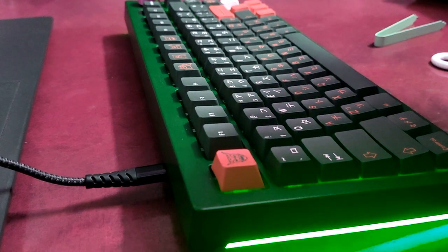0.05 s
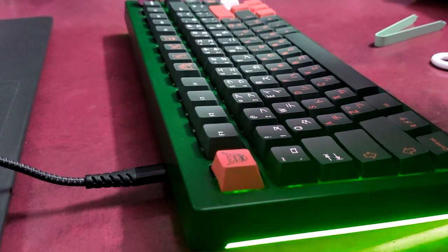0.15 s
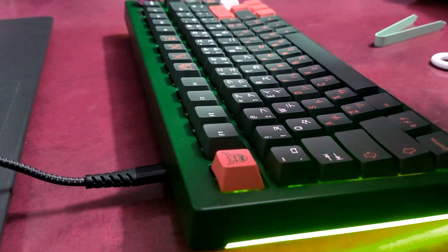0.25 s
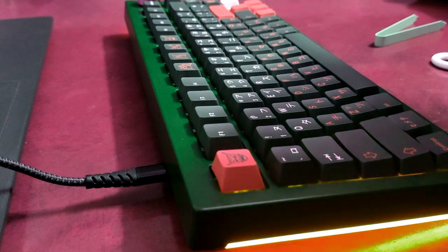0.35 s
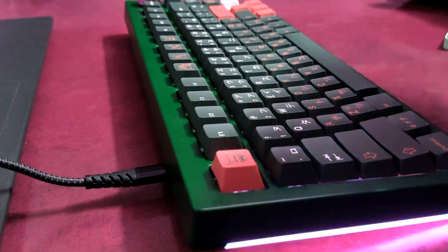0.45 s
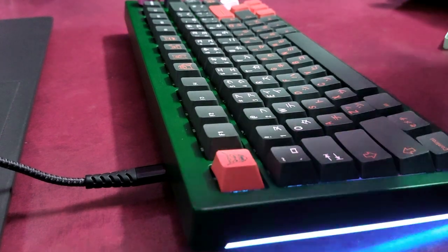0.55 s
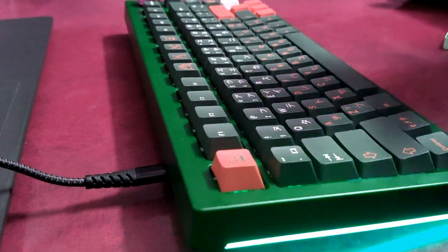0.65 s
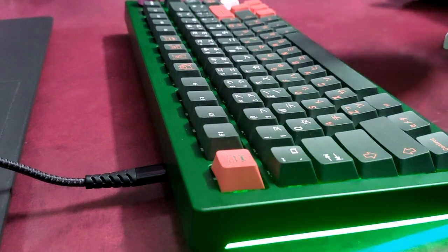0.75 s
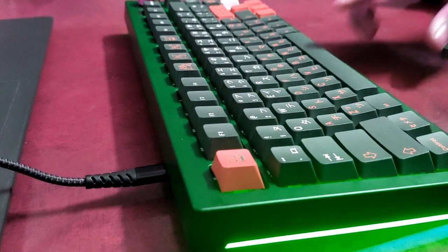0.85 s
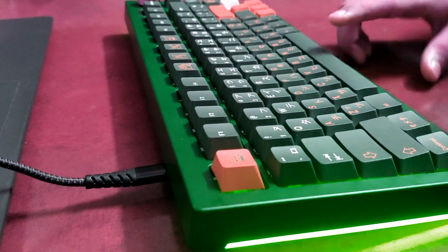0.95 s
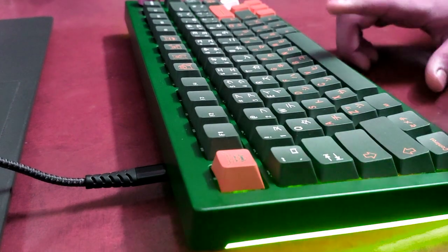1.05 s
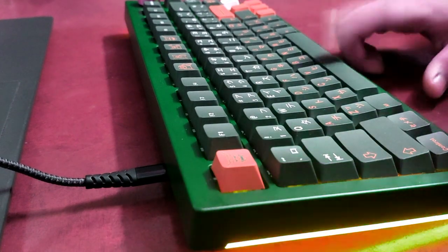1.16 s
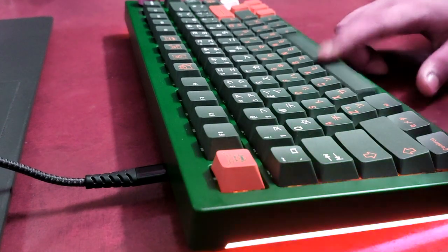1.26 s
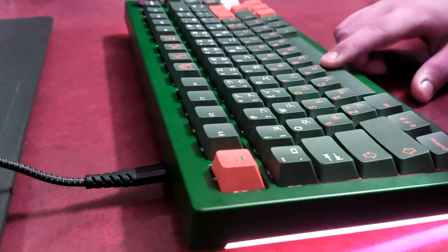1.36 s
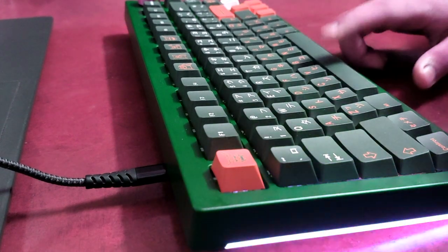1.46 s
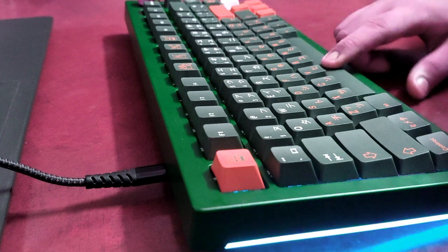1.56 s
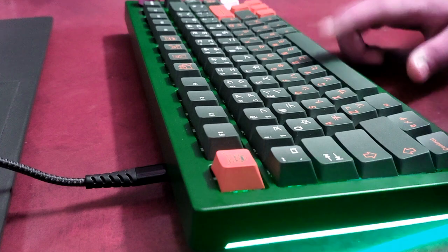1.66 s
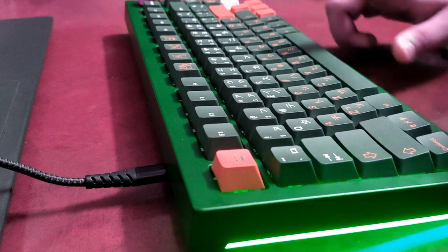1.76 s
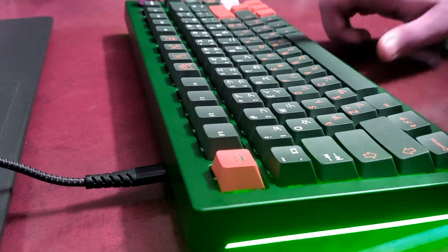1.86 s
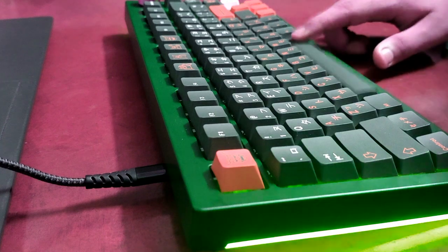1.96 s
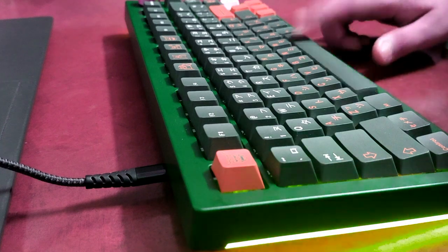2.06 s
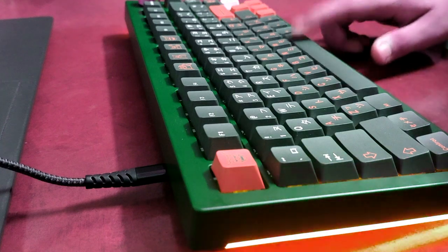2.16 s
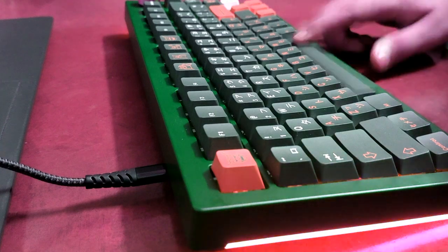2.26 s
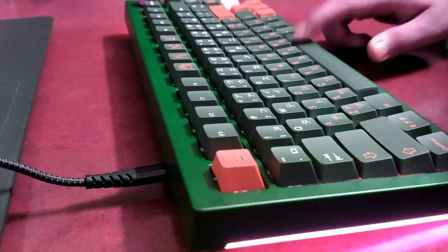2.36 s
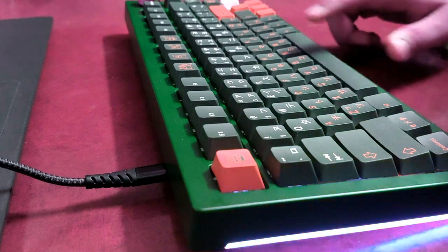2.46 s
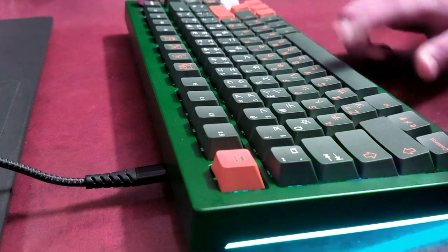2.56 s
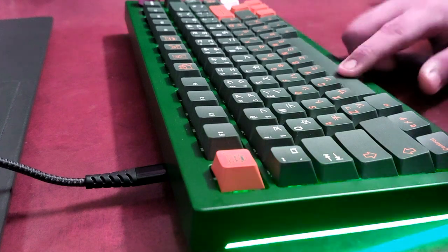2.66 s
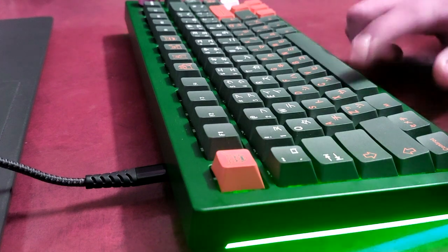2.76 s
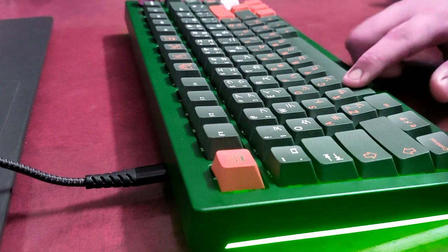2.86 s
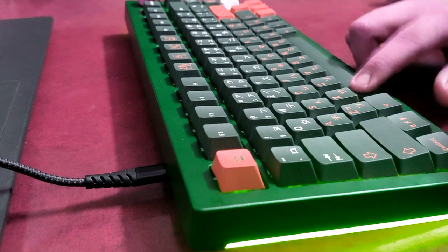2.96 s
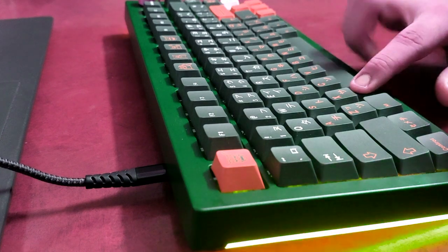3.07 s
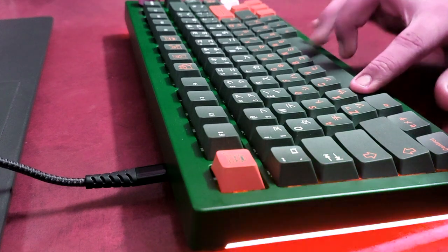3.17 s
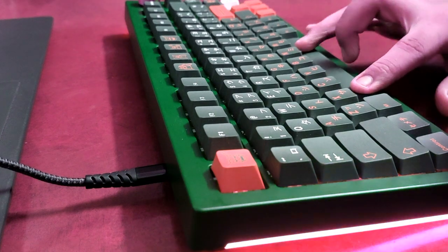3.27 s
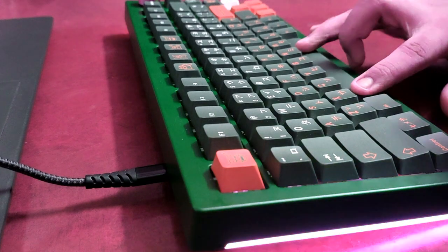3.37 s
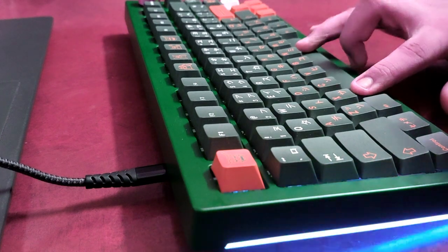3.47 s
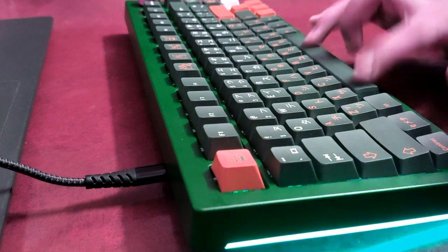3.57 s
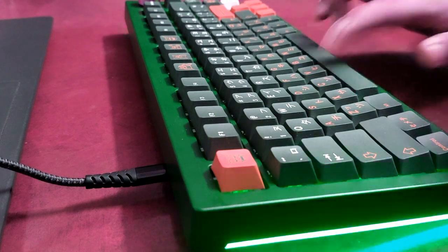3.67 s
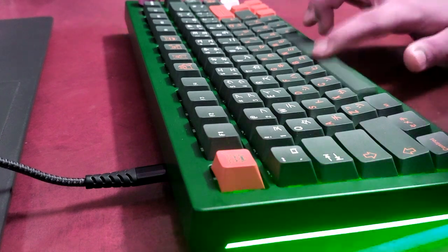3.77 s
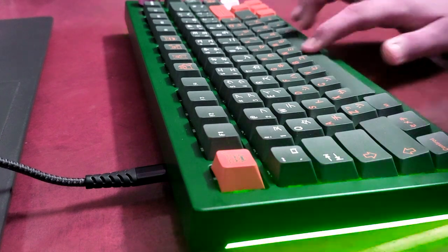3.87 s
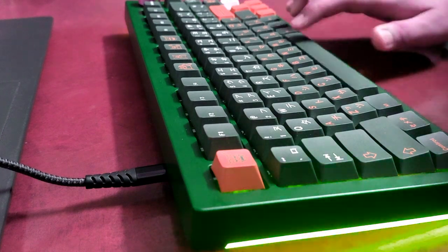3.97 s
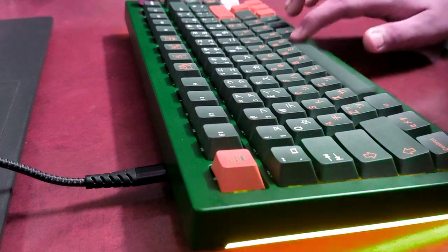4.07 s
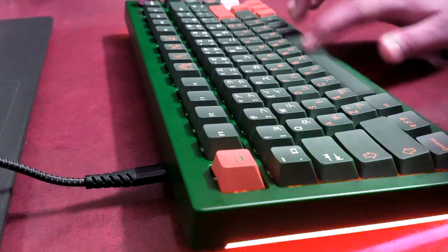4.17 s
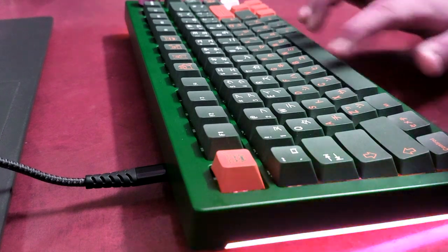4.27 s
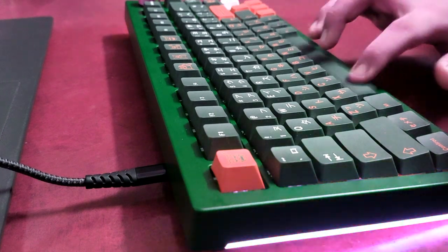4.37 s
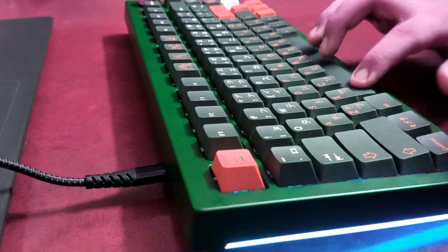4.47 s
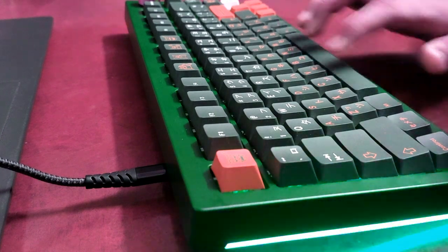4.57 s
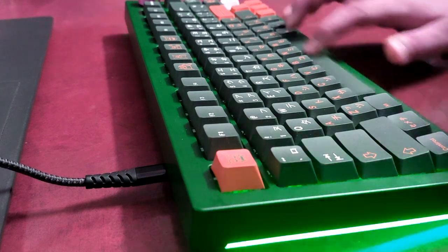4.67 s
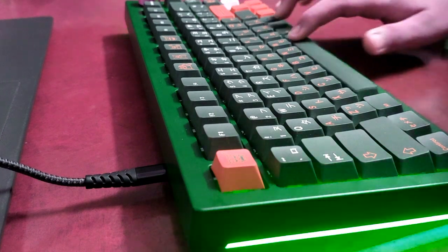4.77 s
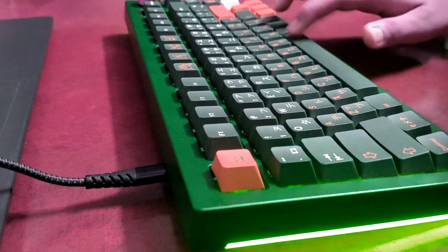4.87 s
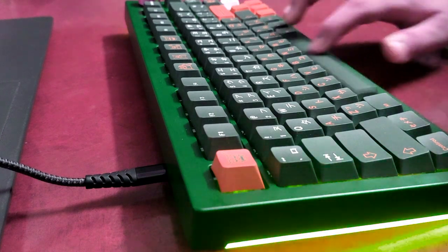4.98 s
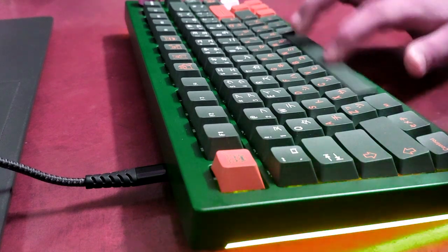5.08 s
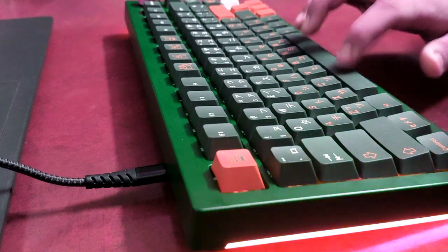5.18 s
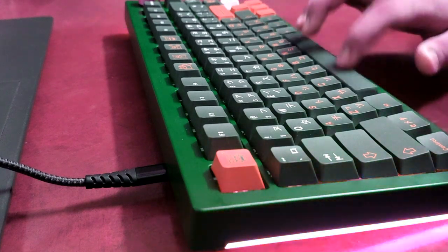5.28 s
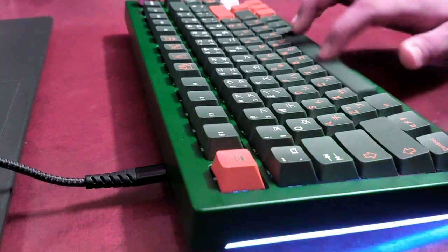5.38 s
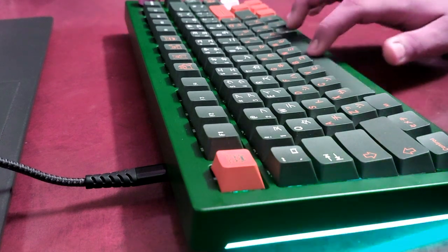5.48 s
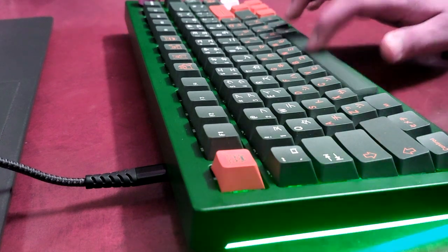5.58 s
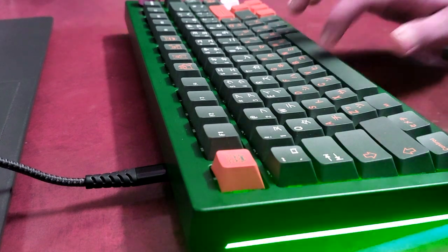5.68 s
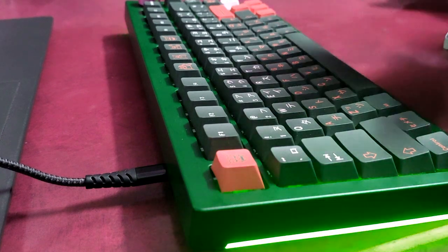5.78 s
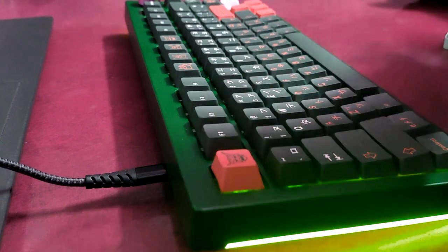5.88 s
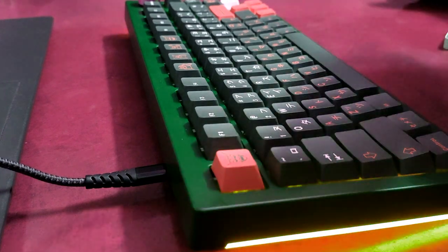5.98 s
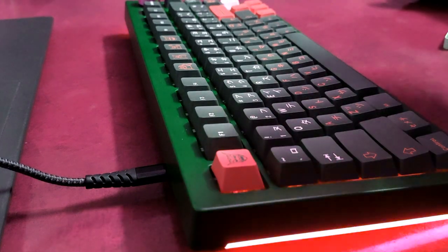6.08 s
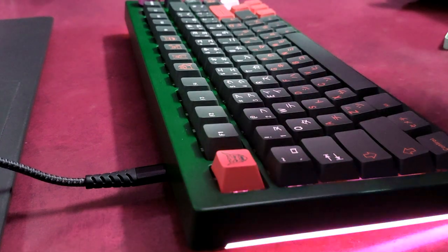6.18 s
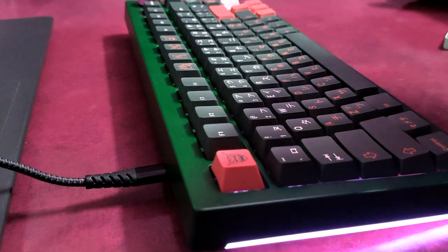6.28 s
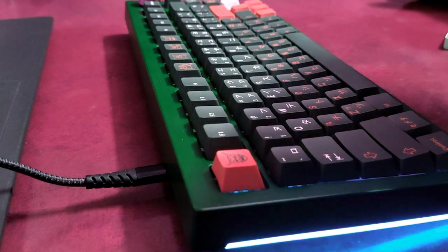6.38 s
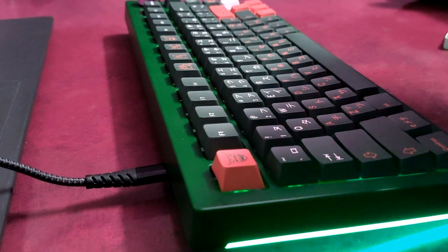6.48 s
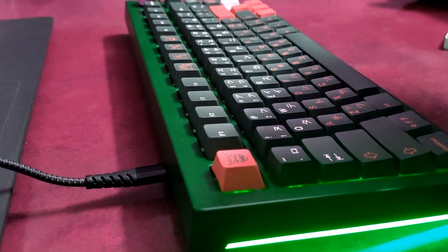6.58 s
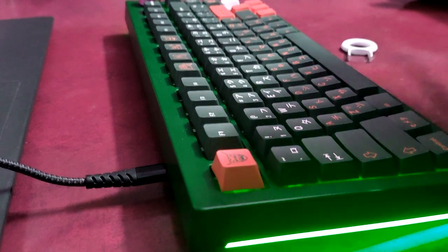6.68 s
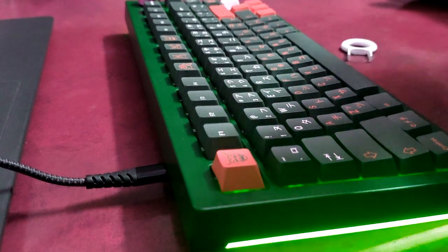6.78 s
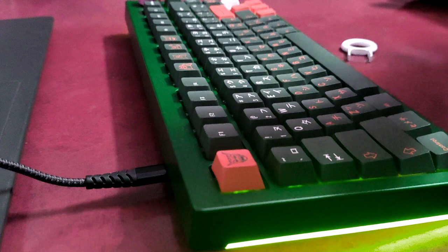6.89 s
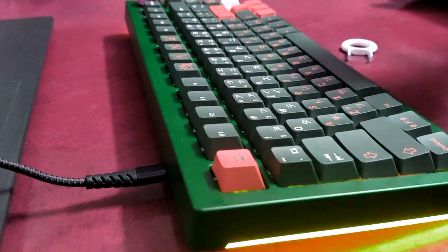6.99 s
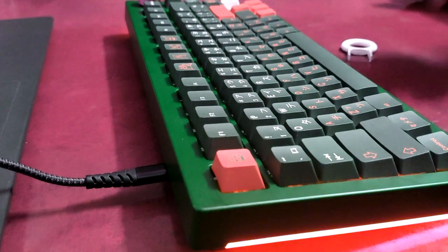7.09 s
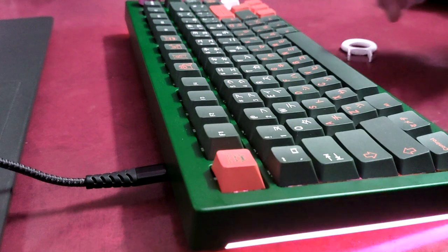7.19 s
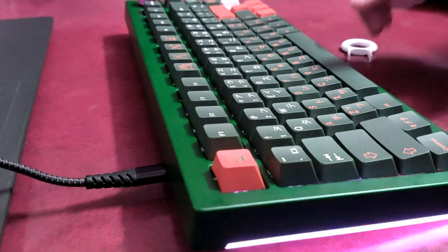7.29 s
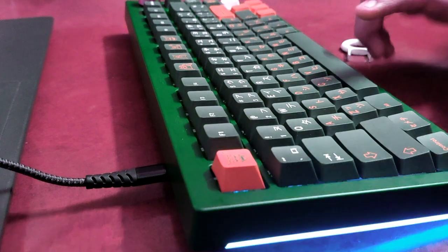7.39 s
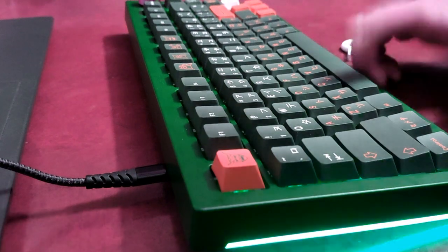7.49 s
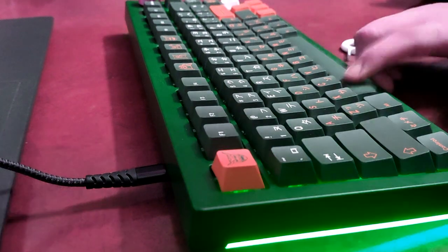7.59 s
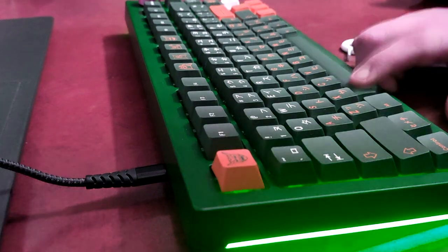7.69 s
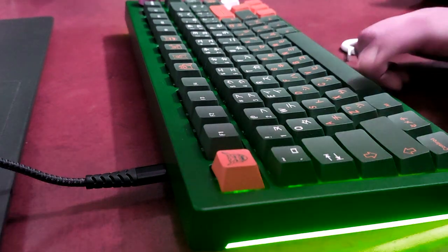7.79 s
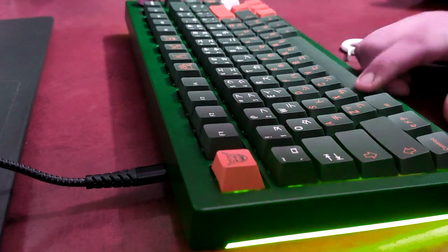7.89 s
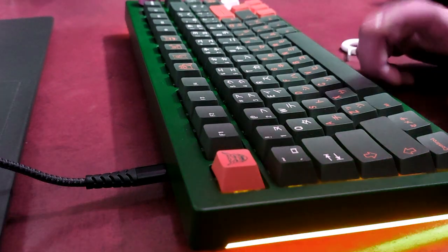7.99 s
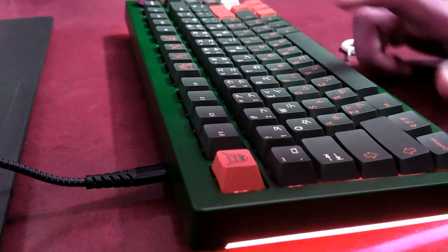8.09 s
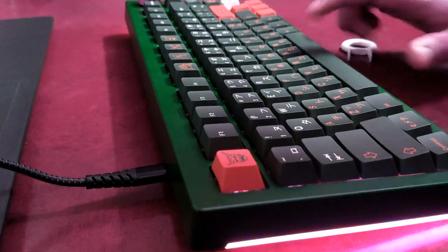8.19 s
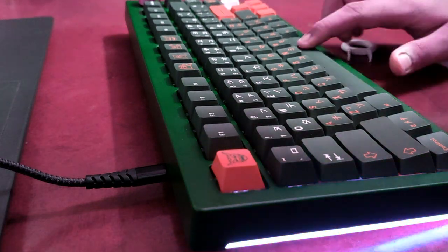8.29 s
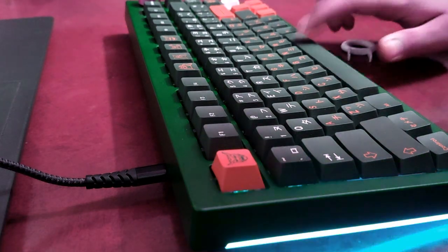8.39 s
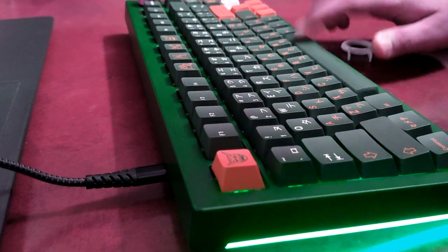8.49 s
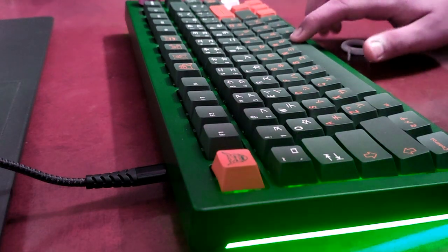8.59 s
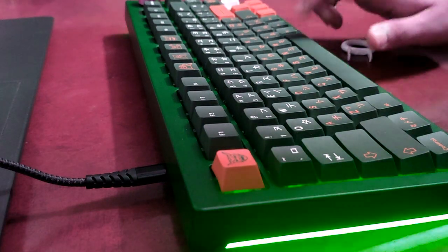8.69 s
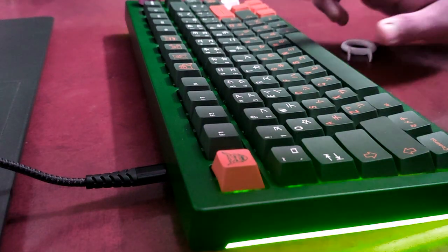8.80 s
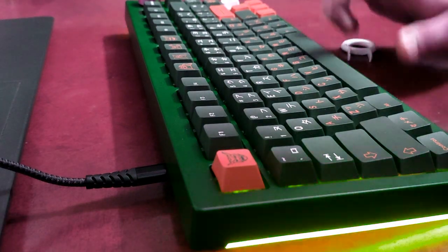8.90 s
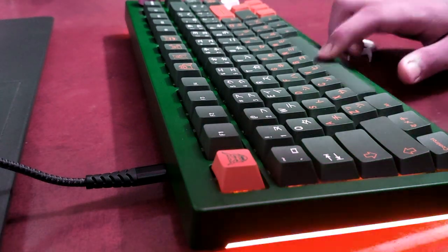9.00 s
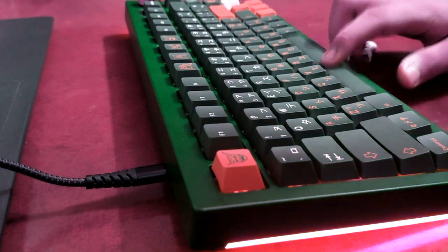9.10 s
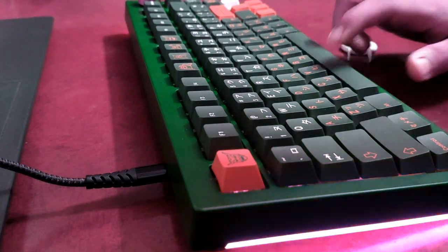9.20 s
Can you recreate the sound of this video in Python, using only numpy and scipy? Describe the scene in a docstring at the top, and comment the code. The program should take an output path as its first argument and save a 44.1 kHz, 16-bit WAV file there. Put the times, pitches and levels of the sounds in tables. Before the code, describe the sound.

A finger strikes a keyboard's long bar in brief, regular bursts. At first each press is a bright, hollow plastic clack with a rattly edge and metallic ring, followed by a lighter return tick. The taps grow busier, then stop, leaving faint hand rustle and quiet hum. Later presses are damped, shorter thocks with barely audible returns. Close microphone, short indoor reflections.

```python
"""Short bursts of taps on the space bar of a mechanical keyboard, close by in stereo: at first hollow and loud,
later damped and softer. Each blow is a chatter of contacts that excites the bar's modes; most presses are
answered by a lighter return stroke. Clusters of close modes give the spring's faint singing, decaying sines the
wire's pings. Echoes and decaying noise form a small room; filtered noise and wavering sines make the hum of a
fan, and swelling noise the swish of a moving hand."""
import sys
import numpy as np
from scipy import signal
from scipy.fft import rfft, irfft
from scipy.io import wavfile
from scipy.ndimage import uniform_filter1d

SR = 44100
rng = np.random.default_rng(int(sys.argv[2]) if len(sys.argv) > 2 else 0)


def generate_wav(signal):
    """Clip the signal to [-1, 1] and save it as 16-bit WAV at the path in sys.argv[1]."""
    frames = np.transpose(np.atleast_2d(signal))
    scaled = np.clip(frames, -1, 1) * 32767
    pcm = np.round(scaled).astype(np.int16)
    wavfile.write(sys.argv[1], SR, pcm)


N = 407484
TAPS = 8192  # samples in the response to one blow
HZ = np.fft.rfftfreq(TAPS, 1 / SR)
AGE = np.arange(TAPS) / SR  # seconds since the blow
LEAD = 128  # samples of space ahead of a blow
DOWN, UP = 0, 1  # direction of the bar's travel


def amp(db):
    """Level law: decibels to amplitude gain."""
    return 10 ** (np.asarray(db) / 20)


def evened(x):
    """Normalization: scales to rms 1."""
    return x / np.sqrt(np.mean(np.abs(x) ** 2) + 1e-20)


def read(points, hz):
    """Interpolates a table linearly on a log-frequency axis."""
    f, value = np.transpose(points)
    return np.interp(np.log(hz + 1), np.log(f + 1), value)


def follow(curve):
    """Interpolates a table of times at every sample."""
    return np.interp(np.arange(N) / SR, *np.transpose(curve))


def sides(db):
    """Stereo level difference: gains for left and right."""
    return amp(np.array([db, -db]) / 2)


def add(mix, s, sound):
    """Superposition: lays a sound of several channels into the mix."""
    part = mix[:, max(round(s * SR), 0):][:, :sound.shape[1]]
    part += sound[:, :part.shape[1]]


def causal(gain):
    """Minimum phase: the spectrum with these gains that rings only after it is struck."""
    log_gain = np.log(np.maximum(gain, 1e-5))
    circle = np.concatenate([log_gain, log_gain[..., -2:0:-1]], -1)
    return np.exp(np.conj(signal.hilbert(circle)))[..., :len(HZ)]


def pulse(spectrum):
    """Inverse transform: a spectrum as a short sound that starts LEAD samples in."""
    delayed = spectrum * np.exp(-2j * np.pi * HZ * LEAD / SR)
    return irfft(delayed)[:TAPS // 2]


def presses(rows, modes, low_hz, level_db, spring_db, lead_in_db, settle_s):
    """Impact: a faint swelling noise leads into each blow as the bar bottoms out; off centre, it lands twice."""
    # Relative level in dB of thock, clack, snap, click and fizz for a blow in the middle: it clacks.
    centre_db = [-3.5, 4.5, 0, 1.5, -4.5]
    # The same five bands in dB for a blow on one end: it thocks.
    end_db = [5, -10, -2, 0, -1.5]
    swell_s = 0.011
    out = np.zeros((3, N))
    for s, db, off_centre, hardness_db in rows:
        off = np.clip(off_centre, 0, 1)
        bands_db = (1 - off) * np.array(centre_db) + off * np.array(end_db)
        colour = body(modes, DOWN, low_hz) * amp(db + level_db + tone_db(bands_db, hardness_db))
        rock_s = off * 0.0021 - .0002  # the further off centre, the later the second landing
        blow = chatter(rock_s, first=0.99, settle_s=settle_s, smooth=0.71)
        add(out, s - LEAD / SR, pulse(colour * blow))
        add(out, s, amp(db + spring_db) * spring(DOWN))
        swelling = rng.standard_normal(TAPS) * (AGE < swell_s) * (0.2 + AGE / swell_s)
        lead_in = evened(rfft(swelling))
        add(out, s - swell_s - LEAD / SR, amp(lead_in_db) * pulse(colour * lead_in))
    return out


def releases(rows, modes, low_hz, level_db, spring_db, settle_s):
    """Return impact: the spring throws the bar against its top stop and is left ringing."""
    # Relative level in dB of thock, clack, snap, click and fizz.
    release_db = [0.43, 0, -0.12, 0.82, -1.3]
    out = np.zeros((3, N))
    for s, db, hardness_db in rows:
        tone = tone_db(np.array(release_db), hardness_db)
        colour = body(modes, UP, low_hz) * amp(db + level_db + tone)
        blow = chatter(.0006, first=1.0, settle_s=settle_s, smooth=.9)
        add(out, s - LEAD / SR, pulse(colour * blow))
        add(out, s, amp(db + spring_db) * spring(UP))
    return out


def tone_db(bands_db, hardness_db):
    """Contact stiffness: a harder blow lifts snap, click and fizz but not thock and clack; dB over HZ."""
    # Centre frequencies in Hz of thock, clack, snap, click and fizz.
    tone_hz = [800, 1350, 2350, 4600, 9500]
    # Factors by which snap, click and fizz follow the hardness.
    hardness_share = [1, 1, 1.2]
    tone = bands_db + hardness_db * np.append(np.zeros(2), hardness_share)
    return read(list(zip(tone_hz, tone)), HZ)


def body(modes, direction, low_hz):
    """Modal resonance: the bar's damped modes toward left port, right port and room."""
    # Each row: frequency in Hz, phase in radians by which the left port leads the right.
    port_phase = [(500, 1), (760, 0.94), (900, 0.75), (1050, 1.8), (1400, 0.48), (1850, -2.5), (2200, -0.1),
                  (4500, 0.5), (6000, 1), (7800, 2), (9500, 1.1), (14000, 0.73)]
    hz, width, down, up, side = np.transpose(modes)[:, :, None]
    # the finger lands on a different spot each time, which loads and favours different modes
    load, favour = rng.standard_normal((2, len(modes), 1)) / (1 + direction)
    shape = 1 / (1 + (2 * (HZ - hz * (1 + 0.021 * load)) / width) ** 2)
    mode_gain = amp((down, up)[direction] + 0.62 * favour) * sides(side) * shape
    gain = np.linalg.norm(mode_gain, axis=1)
    gain = gain / np.sqrt(1 + (low_hz / (HZ + 1)) ** 10)  # a small cap radiates little bass
    common = np.sqrt((gain ** 2).mean(0))
    ports = gain * np.exp(1j * np.outer([.5, -.5], read(port_phase, HZ)))
    # treble peaks colour only the direct sound; the room receives a smoother treble
    smoothed = np.sqrt(np.abs(uniform_filter1d(common ** 2, size=330)))
    share = np.clip((HZ - 1800) / 3500, 0, 1)
    around = (1 - share) * common + share * smoothed
    return causal(common) / common * np.vstack([ports, around])


def chatter(delay, first, settle_s, smooth):
    """Repeated impact: one end of the bar lands, then the rest, each in a brief chatter of contacts."""
    late = AGE - max(delay, 0)
    first_force = first * np.exp(-(AGE / settle_s) ** 2)
    force = first_force + (late >= 0) * np.exp(-(late / settle_s) ** 2)
    z = rfft(force * rng.standard_normal(TAPS))
    # each contact is so short that it excites all modes about alike
    contacts = irfft(z / (np.abs(z) + 1e-9) ** min(smooth, 1))
    return evened(rfft(contacts * np.sqrt(force)))


def spring(direction):
    """Beating: clusters of close, long modes interfere, differently at each blow."""
    # Ringing of spring, stabiliser wire and case. Each row: frequency in Hz, width in Hz, relative level in dB
    # on a press, the same on a release, 60 dB decay time in seconds ahead of the final fade.
    clusters = [(756.6, 60, -44.5, -35, 0.19), (915, 170, -48, -36, 0.76), (1840, 220, -41, -40.5, 0.22),
                (3465, 430, -40, -42, 0.16)]
    ring = np.zeros((3, TAPS))
    for hz, width, down, up, t60 in clusters:
        band = 1 / (1 + (2 * (HZ - hz) / width) ** 4)
        cluster = irfft(rfft(rng.standard_normal((3, TAPS))) * band)
        level_db = (down, up)[direction] + 1.3 * rng.standard_normal()
        ring += evened(cluster) * amp(level_db - 60 * AGE / t60)
    return ring * (1 - AGE / AGE[-1])


def pings(rows, level_db):
    """Free decay: each hollow blow sets off a short, clear ping of the stabiliser wire, heard once more about
    20 ms later."""
    ping_hz, t60 = 3474, 0.018  # mean pitch; decay in seconds
    out = np.zeros((3, N))
    for s, db in rows[:, :2]:
        for late_s, again_db in [(0, 0), (0.021, 1.5)]:  # the repeat is slightly louder
            hz = ping_hz * (1 + 0.021 * rng.standard_normal())
            note = np.sin(2 * np.pi * (hz * AGE + rng.random((3, 1))))
            decay = amp(db + level_db + again_db - 60 * AGE / t60)
            add(out, s + late_s, note * np.minimum(AGE / .001, 1) * decay)
    return out


def touches(level_db, tilt_db):
    """Light impact: a fingertip rattles the loose cap, heard left, right and in the room."""
    # Soft knocks: mostly the fingertip landing and shifting the cap just before a press; the faint one at 6.623
    # s # is a click where the scene changes. Each row: start in seconds, relative strength in dB.
    landings = [(2.007, 1.5), (2.19, 4.5), (2.376, 5), (3.46, -2), (3.961, -3), (4.112, 1), (4.27, -2),
                (6.623, -20), (7.611, -6), (7.774, -9), (7.936, -11), (8.325, 4), (8.489, 0), (8.651, 2)]
    # Each row: frequency in Hz, level in dB ahead of the tilt.
    touch_colour = [(300, -16.5), (700, -13), (1400, -5), (2500, -9.5), (3800, -7), (5200, -17),
                    (8000, -26), (15000, -31.5)]
    out = np.zeros((3, N))
    octaves = np.log2(np.maximum(HZ, 500) / 1400)
    colour = causal(amp(read(touch_colour, HZ) + tilt_db * octaves))
    colour = colour * np.append(sides(-2.5), 1)[:, None]
    for s, db in landings:
        rattle = chatter(0.00079, first=0.84, settle_s=0.015, smooth=0.98)
        add(out, s - LEAD / SR, amp(db + level_db) * pulse(colour * rattle))
    return out


def room(x, echo_db, tail_db, build_s):
    """Slowly blended reverberation: two random responses of one small room alternate, for a smooth tail."""
    turn = 2 * np.pi * 1.3 * np.arange(N) / SR  # 1.3 turns a second
    wet = np.zeros((2, N))
    for blend in (np.cos(turn), np.sin(turn)):
        reflections = response(echo_db, tail_db, build_s)
        wet += signal.oaconvolve((x * blend)[None], reflections, axes=1)[:, :N]
    return wet


def response(echo_db, tail_db, build_s):
    """Room impulse response: a few single echoes, then a diffuse tail in which each band dies at its own speed."""
    # Desk, walls and ceiling. Each row: mean delay in seconds, relative level in dB.
    echoes = [(.0048, -12.5), (.0078, -29.5), (.0125, -24.5), (.0168, -27.5), (.0195, -32.5), (.0212, -21),
              (.041, -31.5)]
    # Each row: frequency in Hz, 60 dB decay time in seconds.
    room_t60 = [(500, .3), (1000, 0.28), (2000, 0.28), (4000, 0.38), (8000, 0.38), (15000, .21)]
    # Share of a blow that goes into the tail. Each row: frequency in Hz, relative level in dB.
    room_send = [(500, -9), (780, -8.5), (950, -4), (1350, -10.5), (1900, 0), (2500, -4.5), (3500, -0.5),
                 (5000, -8), (7500, -9.5), (9000, -10), (9900, -11.5), (11200, -5.5), (15000, -3)]
    size = SR // 2
    t = np.arange(size) / SR
    hz, age, z = signal.stft(rng.standard_normal((2, size)), SR, nperseg=256)
    t60 = read(room_t60, hz)[:, None]
    even_energy = np.sqrt(2 * np.log(1000) / (t60 * SR))  # long and short decays carry alike
    z *= amp(read(room_send, hz)[:, None] - 60 * age / t60) * even_energy
    diffuse = signal.istft(z, SR, nperseg=256)[1][:, :size]
    tail = amp(tail_db) * diffuse * np.clip(t / build_s, 0, 1)
    for s, db in echoes:
        for port in tail:
            port[round(abs(s + rng.uniform(-.0004, .0004)) * SR)] += amp(db + echo_db)
    return tail


def swish(level_db):
    """Friction noise: soft broad rubbing swells and fades with each move of the hand."""
    # Each row: frequency in Hz, level in dB ahead of the tilt.
    swish_colour = [(800, -20), (2400, -3), (3400, -1), (5000, -5.5), (6300, 0.5), (8800, -3), (9900, -9.5),
                    (11200, 0.5), (15000, -4.5)]
    # Hand and sleeve brush over the desk. Each row: time of the peak in seconds, relative level in dB,
    # half length in seconds, treble tilt in dB per octave above 2500 Hz.
    strokes = [(0.112, -75, 0.1, -2), (0.753, -59.5, 0.057, 2), (0.826, -62, .058, 0),
               (1.04, -71, 0.077, 0.5), (3.479, -66.5, 0.062, -9), (4.348, -43, 0.019, 3),
               (4.471, -44, 0.12, 5), (4.777, -58.5, .13, 2), (5.053, -55.5, 0.053, 0),
               (5.245, -61, .07, 6), (5.601, -57.5, 0.1, 7), (6.036, -61.5, 0.056, 3.5),
               (6.123, -62.5, 0.11, 8), (6.429, -52, .052, 11), (6.461, -68, 0.17, -4),
               (7.023, -72, .075, .5), (7.195, -60.5, 0.056, 4.5), (7.399, -66.5, 0.31, .5),
               (8.339, -62.5, .08, 4), (8.552, -72, 0.16, -7)]
    out, hz = np.zeros((2, N)), np.fft.rfftfreq(SR, 1 / SR)
    t = np.arange(SR) / SR - .5
    for s, db, half_s, tilt in strokes:
        octaves = np.log2(np.maximum(hz, 2500) / 2500)
        colour = amp(read(swish_colour, hz) + tilt * octaves)
        rub = evened(irfft(rfft(rng.standard_normal((2, SR))) * colour))
        # random unevenness of level
        rub *= amp(2.0 * evened(uniform_filter1d(rng.standard_normal(SR), size=700)))
        stroke = amp(db + level_db) * rub * np.exp(-(t / half_s) ** 2)
        start = max(round((.5 - s) * SR), 0)  # trims what would begin before time zero
        add(out, s - .5, stroke[:, start:])
    return out


def fan(rush_db, tones_db, waver):
    """Tonal and broadband flow noise: slightly wavering motor tones in a low rush of air."""
    # Each row: frequency in Hz, relative level in dB.
    fan_tones = [(48, -69.5), (80.7, -62.5), (99.3, -62), (117, -67.5), (165, -65.5), (199.8, -60.5),
                 (241, -60.5), (300.3, -55.5), (333, -63), (399, -78), (438, -72.5), (487, -63.5),
                 (1378, -79.5)]
    # Rush of air. Each row: frequency in Hz, relative density in dB per Hz.
    fan_rush = [(20, -27.5), (50, -21.5), (85, -3.5), (120, -6), (145, -15.5), (205, -9.5), (240, 0),
                (300, -2), (370, -8.5), (510, -12), (610, -19), (1050, -18.5), (1500, -29.5), (2200, -29.5)]
    # Faint hiss above the rush. Each row: frequency in Hz, relative density in dB per Hz.
    hiss = [(2200, -33), (3400, -40), (4700, -46), (7200, -40), (8800, -34), (9900, -49), (12000, -46),
            (15000, -45.5)]
    # Each row: frequency in Hz, left-right likeness from -1 to 1.
    fan_same = [(60, 0.49), (130, 1), (290, 0.43), (640, -0.4), (1410, -0.4), (3100, 0.59), (6820, -0.32),
                (15000, -0.039)]
    # Each row: time in seconds, relative level in dB.
    fan_level = [(0.0, -51), (1.08, -49.5), (1.49, -53.5), (5.99, -53), (6.59, -50), (9.24, -52)]
    t, hum = np.arange(N) / SR, np.zeros((2, N))
    knots = np.linspace(0, t[-1], num=70)
    for hz, db in fan_tones:
        drift, swell = (np.interp(t, knots, v) for v in rng.standard_normal((2, len(knots))))
        tone = np.sin(2 * np.pi * hz * t + waver * drift)
        hum += np.sqrt(2) * amp(db + 2.5 * swell) * sides(1.5)[:, None] * tone
    level = amp(follow(fan_level))
    rush = level * amp(rush_db) * noise(fan_rush + hiss, fan_same)
    return rush + evened(level) * amp(tones_db) * hum


def noise(colour, same):
    """Partial coherence: steady stereo noise of a given colour and left-right likeness."""
    # Each row: frequency in Hz, left-right level difference in dB.
    fan_side = [(60, 2.5), (110, 0.5), (200, 8.5), (380, 0), (700, -1), (1290, 3.5), (2380, -2),
                (4400, 2.5), (8120, 4.5), (15000, 1)]
    hz = np.fft.rfftfreq(N, 1 / SR)
    a, b = rfft(rng.standard_normal((2, N)))
    c = np.clip(read(same, hz), -1, 1)
    z = np.array([a, c * a + np.sqrt(1 - c ** 2) * b])
    return evened(irfft(z * amp(read(colour, hz)) * sides(read(fan_side, hz)), N))


def scene():
    """Superposition of the keys close by, their room, and the background."""
    # Modes of the hollow bar. Each row: mean frequency in Hz, width in Hz, relative level in dB going down,
    # the same coming up, left-right level difference in dB.
    hollow = [(570, 71, -14.5, -22, -11), (736, 110, -4.5, -26.5, 2), (783, 100, -10.5, -5.5, 12),
              (977.5, 120, -3, -10.5, 2.5), (1258, 220, -1, -11.5, 3.5), (1420, 240, -2.5, -13, 8.5),
              (1739, 310, -5, -13.5, -1), (1920, 300, -12.5, -18, -5), (2176, 240, -5, -17.5, -6.8),
              (2384, 390, -4.5, -19, -0.5), (2556, 260, -6.5, -19.5, -1.8), (2897, 257, -8.5, -20, -5.5),
              (3437, 120, -21, -13, 2), (3660, 1200, -17, -34.5, -5), (4750, 260, -13, -22.5, -10.5),
              (5610, 1570, -12, -24, -6), (7130, 390, -13, -17.5, 8), (8020, 1400, -13.5, -23.5, 2),
              (9040, 250, -12, -20.5, 14.5), (11100, 910, -15.5, -23, -2), (12960, 1800, -22.5, -35, -4.5),
              (14400, 12000, -25.5, -42, 11)]
    # Modes of the damped bar, with the same columns and units.
    damped = [(543, 104, -6, -10, 3), (663, 90, -14, -23, -16), (810, 100, -40, -7.5, -2),
              (910, 61, -7.5, -2, 4.5), (1200, 100, -1, 1.5, 5), (1243, 260, -10, -19, 3),
              (1390, 390, -4, -3.5, 3.5), (1700, 130, -8.5, -19.5, 0.5), (2140, 660, -21.5, -33, -6),
              (2390, 120, -8, -6, -3), (2610, 1500, -32, -18.5, -7), (3540, 140, -33, -9.5, 21),
              (3890, 250, -21.5, -9.5, -4), (4780, 220, -18.5, -9.5, -6), (5210, 310, -19.5, -8, -5),
              (5750, 1300, -27, -18, -2.5), (7370, 170, -21, -4, 2), (8770, 750, -23.5, -11.5, 8.5),
              (11100, 410, -24, -9, 1), (12850, 911, -49.0, -22, 8.0), (14107, 4200, -34, -24, 1)]
    # The bar bottoms out. Each row: time in seconds, relative strength in dB, how far off centre the finger
    # lands from 0 to 1, hardness of the blow in dB.
    press_rows = [(1.3136, 21, .25, -1), (1.479, 16.5, .6, -1), (1.6518, 19, 0.47, 0),
                  (2.0188, 20, 0.75, -2.5), (2.2065, 16, 0.85, -6), (2.3866, 19.5, 0.81, 0.5),
                  (2.7229, 20.5, 0.37, 3), (2.9169, 21, 0.36, 0), (3.083, 16.5, 0.34, 3),
                  (3.4577, -7, 0, -3.5), (3.6845, 14, 0.87, -4), (3.8143, 19, 0.13, -3.5),
                  (3.9774, 15, 0.4, -0.5), (4.1357, 12, 0.72, -7), (4.2874, 15, 0.84, -0.5),
                  (4.434, 15, 0.33, 0), (4.5806, 14.5, 0, -2.5), (4.7354, 20.5, 0.24, -8),
                  (5.0273, 13.5, 0.87, 0.5), (5.1635, 18.5, 0.38, 0), (5.3195, 14.5, 0.23, -2),
                  (5.6065, 13.5, .5, 0.5), (5.73, 19, 0.45, -2), (7.62, 13.5, 0.3, 3.5),
                  (7.7855, 12, 0.53, -3), (7.9485, 10.9, 0.2, -9), (8.3374, 11.5, .2, -3.5),
                  (8.5049, 9, 0.36, -2.5), (8.6638, 13, .35, -3), (9.0178, 17.5, 0.4, 4),
                  (9.1819, 10.3, 0.28, -3.5)]
    # The bar springs back to its top stop. Each row: time in seconds, relative strength in dB, hardness in dB.
    release_rows = [(1.3904, 18.5, -2), (1.5501, 20, 0.5), (1.7485, 17, -2), (2.1004, 14, -1),
                    (2.2798, 16, -.5), (2.4837, 15.5, 0), (2.8195, 19, 2), (3.016, 17, 1.5),
                    (3.89, 15.5, 0), (4.045, 14, -3), (4.1998, 13.5, 0.5), (4.3502, 19, 2), (4.5004, 18, 2),
                    (4.6438, 18, 1), (4.8073, 11, -1), (4.951, 7, -1), (5.0946, 13, -1), (5.2375, 14.5, 2),
                    (5.381, 14, -2.5), (5.6624, 14.7, -3.5), (5.8019, 21.5, -2), (7.703, 3.5, 0),
                    (7.8653, 1.5, 0), (8.013, 3, -1), (8.434, 2, .5), (8.5848, 2.5, 0.5), (8.7545, 2, .5),
                    (9.103, 3.1, -0.7)]
    damped_from_s = 6.6
    down, up = np.array(press_rows), np.array(release_rows)
    hollow_down, hollow_up = down[:, 0] < damped_from_s, up[:, 0] < damped_from_s
    keys = presses(down[hollow_down], hollow, low_hz=587, level_db=-0.8, spring_db=-24, lead_in_db=-22,
                   settle_s=0.0026)
    keys += releases(up[hollow_up], hollow, low_hz=580, level_db=-0.3, spring_db=-31.0, settle_s=0.0011)
    keys += presses(down[~hollow_down], damped, low_hz=394, level_db=0, spring_db=-24, lead_in_db=-16.5,
                    settle_s=0.0016)
    keys += releases(up[~hollow_up], damped, low_hz=450, level_db=-0.8, spring_db=-25.5, settle_s=0.0012)
    keys += pings(down[hollow_down], level_db=-53.5) + pings(up[hollow_up], level_db=-51.5)
    keys += touches(level_db=-4, tilt_db=-1)
    near, around = keys[:2], keys[2]
    background = fan(rush_db=0.15, tones_db=-3.5, waver=.7) + swish(level_db=3.0)
    return near + room(around, echo_db=-5, tail_db=-1.0, build_s=0.0011) + background


def record(dry):
    """Band limitation: a linear-phase low-pass removes the highest treble."""
    low_pass = signal.firwin(255, 15700, window=("kaiser", 9), fs=SR)  # edge in Hz
    return signal.oaconvolve(dry, low_pass[None], "same")


dry = scene()
out = record(dry)
generate_wav(out)
```